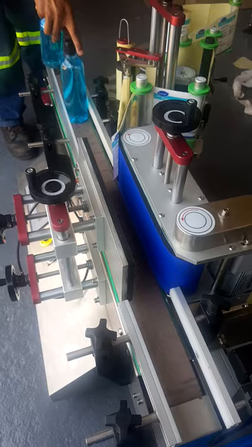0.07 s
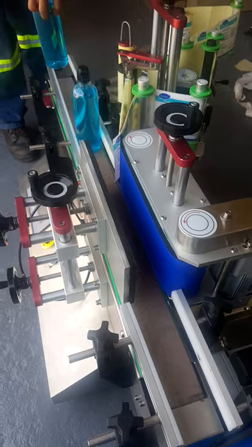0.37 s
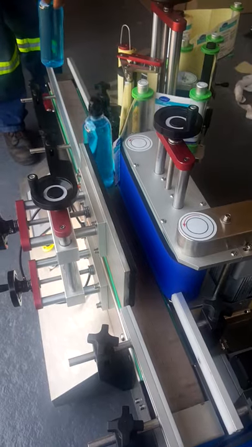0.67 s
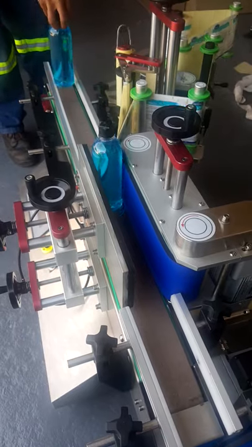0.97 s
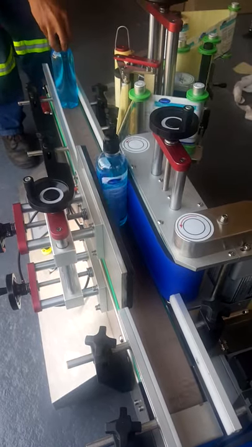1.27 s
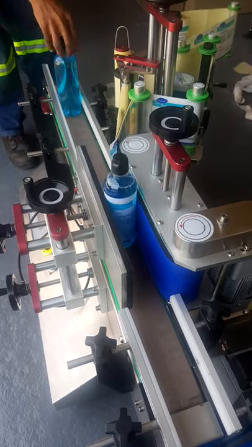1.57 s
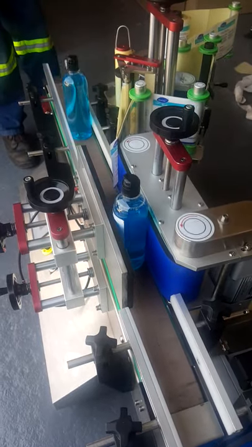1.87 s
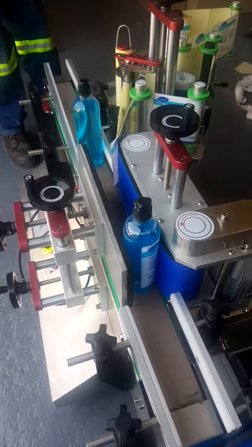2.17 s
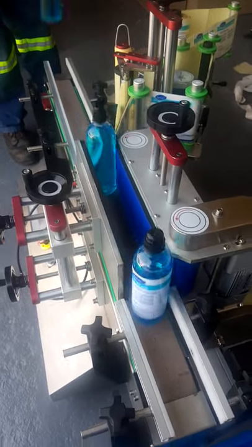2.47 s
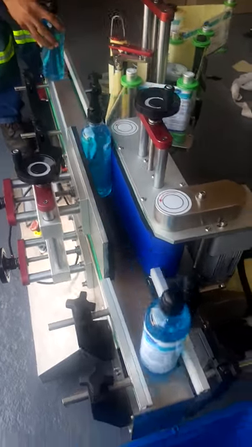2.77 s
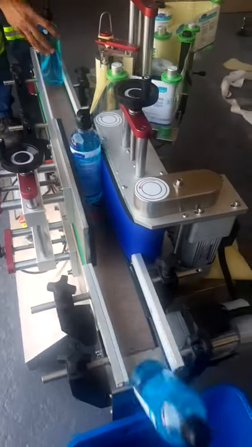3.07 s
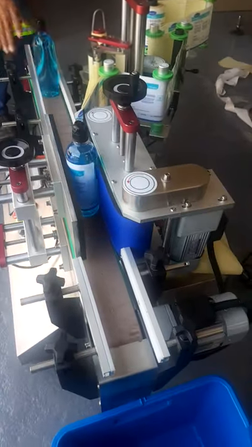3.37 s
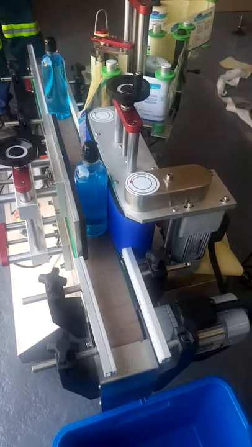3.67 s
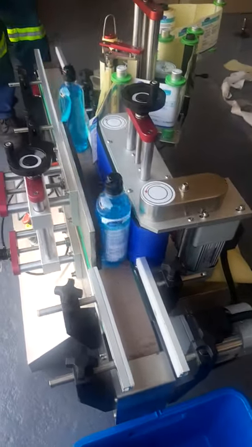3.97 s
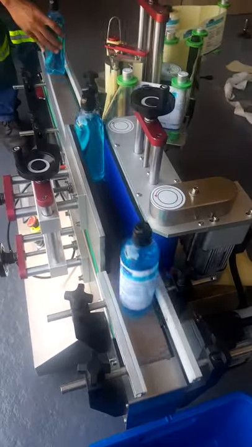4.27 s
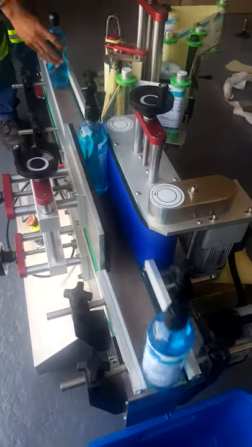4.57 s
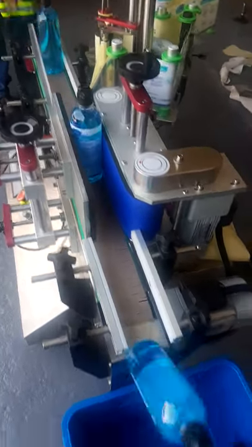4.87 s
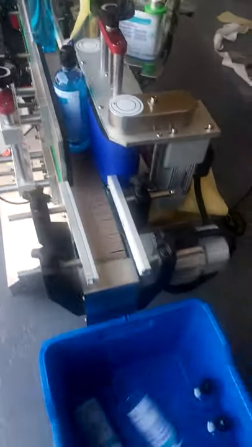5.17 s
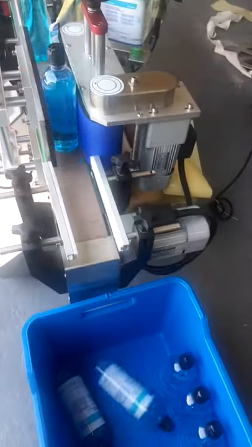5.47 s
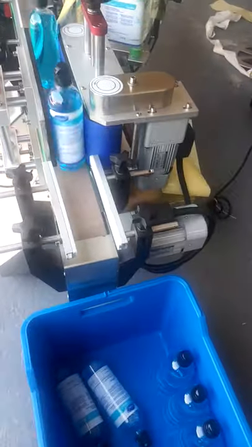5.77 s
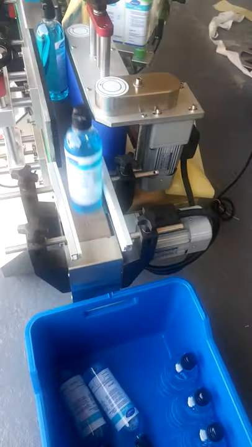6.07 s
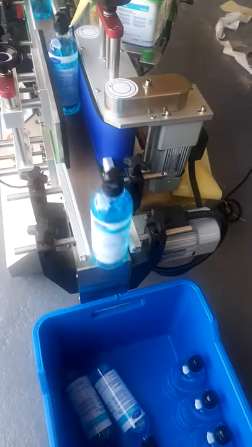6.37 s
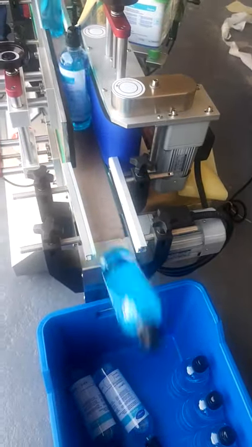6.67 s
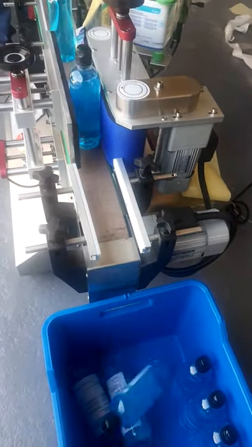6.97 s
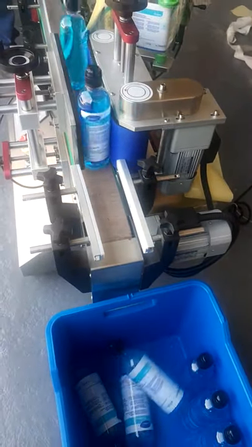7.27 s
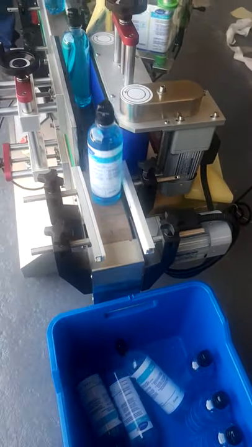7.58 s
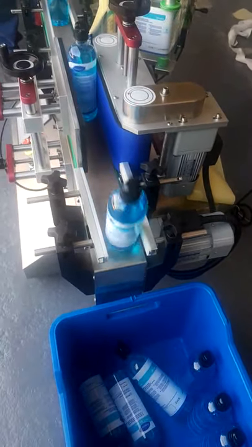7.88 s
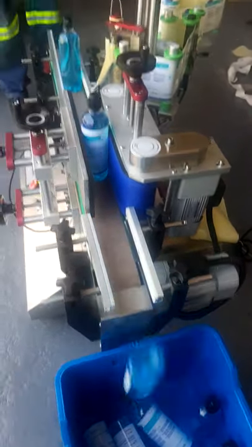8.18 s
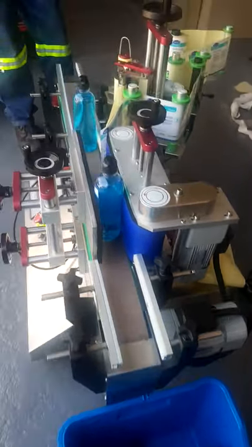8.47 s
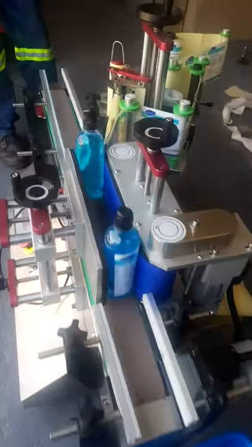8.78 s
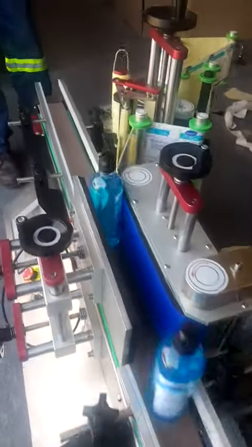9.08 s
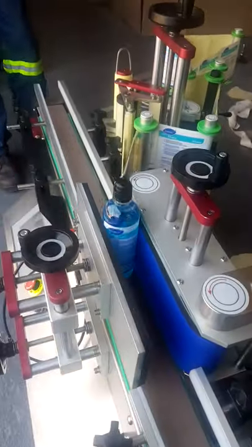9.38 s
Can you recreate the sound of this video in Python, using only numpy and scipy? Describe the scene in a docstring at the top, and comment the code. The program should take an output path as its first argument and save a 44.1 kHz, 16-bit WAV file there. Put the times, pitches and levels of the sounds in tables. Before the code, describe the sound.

Full plastic bottles drop one by one into a plastic tub with hollow thumps, over a quiet conveyor and short puffs of air.

```python
"""A small bottle labelling machine in a workshop, label head to the left, a bin below the microphone. The sound
fades in: the motor hums, the belt rumbles, a slat chain ticks along its guides. From about 1 s on, air hisses
for each label, the label web squeaks, metal parts click, a bottle is set down on the belt, and now and then a
bottle scrapes the rail. From 3.4 s on, four filled plastic bottles tip off the belt, thud into the plastic bin
and tumble over each other. The gain on the machine dips after the first, then recovers."""
import sys
import numpy as np
from scipy import signal
from scipy.fft import rfft, irfft, next_fast_len
from scipy.io import wavfile

SR = 44100
rng = np.random.default_rng(int(sys.argv[2]) if len(sys.argv) > 2 else 0)


def wav_record(signal):
    """Record a signal, one row per channel, as 16-bit PCM in the file named by sys.argv[1]."""
    frames = np.transpose(np.atleast_2d(signal))
    bounded = np.clip(frames, -1, 1)
    # unit amplitude maps onto the largest positive 16-bit level
    quanta = np.round(bounded * 32767).astype(np.int16)
    wavfile.write(sys.argv[1], SR, quanta)


N = 424241
TIME = np.arange(N) / SR


def from_db(db):
    """Decibels to gain."""
    return 10 ** (np.asarray(db) / 20)


def rms_one(x):
    """Scale to rms 1."""
    return x / np.sqrt(np.mean(x ** 2) + 1e-20)


def at_hz(points, hz):
    """Read a table on a log-frequency axis."""
    freqs, values = np.transpose(points)
    return np.interp(np.log(np.maximum(hz, 1)), np.log(freqs), values)


def add(out, s, sound):
    """Mix a short sound in at s seconds."""
    start = max(round(s * SR), 0)
    out[..., start:start + sound.shape[-1]] += sound[..., :N - start]


def filtered(x, kind, hz, order=2):
    """Causal low-, high- or band-pass."""
    return signal.sosfilt(signal.butter(order, hz, kind, fs=SR, output="sos"), x + 1e-18)


def dying(t, t60):
    """Exponential decay, 60 dB down after t60 seconds."""
    return np.exp(-np.log(1000) * t / t60)


def drift(per_s, size=N):
    """A random wander through per_s points a second; rms 1."""
    knots = rng.standard_normal(int(per_s * size / SR) + 2)
    return rms_one(np.interp(TIME[:size] * per_s, np.arange(len(knots)), knots))


def pan(left_db):
    """Channel gains for a source left of the microphone."""
    return from_db(np.array([[.5], [-.5]]) * left_db)


def shaded(x, shade):
    """The microphone's right side is shaded from a source on the left; shade lists f/Hz, loss/dB."""
    gain = from_db(-at_hz(shade, np.fft.rfftfreq(2 * N, 1 / SR)))
    return np.array([x[0], irfft(rfft(x[1], 2 * N) * gain)[:N]])


# likeness of left and right at the microphone: f/Hz, correlation
STEREO_LIKENESS = [(60, 0.71), (130, 1), (260, 0.93), (500, 0.74), (1000, 0.019), (5000, 0.048)]

def noise(spectrum=((100, 0), (1000, 0)), size=N):
    """Coloured stereo noise, alike in the bass and unrelated in the treble; rms 1."""
    length = next_fast_len(size, True)
    hz = np.fft.rfftfreq(length, 1 / SR)
    mid, side = rfft(rng.standard_normal((2, length)))
    alike = at_hz(STEREO_LIKENESS, hz)
    both = np.sqrt(1 + alike) * mid + np.sqrt(1 - alike) * side * [[1], [-1]]
    return rms_one(irfft(both * from_db(at_hz(spectrum, hz)), length)[:, :size])


# decay of the room around the microphone: f/Hz, t60/s
ROOM_DECAY = [(100, 0.61), (300, 1), (600, 0.51), (1500, 0.7), (4000, 0.57), (12000, 0.29)]

def workshop(x, build_s=0.012):
    """Diffuse reverberation that builds up quickly and lasts longest in the bass."""
    t, edges = TIME[:SR], np.geomspace(40, 16000, 10)
    tail = 0
    for low, high in zip(edges, edges[1:]):
        t60 = at_hz(ROOM_DECAY, np.sqrt(low * high))
        tail += filtered(noise(size=len(t)), "band", [low, high]) * dying(t, t60)
    tail *= 1 - np.exp(-t / build_s)
    return signal.fftconvolve(x, tail / np.sqrt(np.sum(tail ** 2) / 2), axes=1)[:, :N]


# recording gain on the machine's sound: t/s, level/dB
GAIN_CURVE = [(0.4, -79.5), (0.6, -66), (2.05, -54), (2.75, -39), (3.35, -34), (4.05, -50.5), (4.5, -46),
              (5.8, -44), (6.2, -40.5), (6.9, -44), (7.8, -36), (9.3, -37.5), (9.6, -38)]
GAIN_OPEN = TIME > GAIN_CURVE[0][0]

def gain_db(s):
    """The gain on the machine's sound fades in, dips after the first fall, then recovers."""
    return np.interp(s, *np.transpose(GAIN_CURVE))


# notes of the motor: f/Hz, level/dB, unused
MOTOR_NOTES = [(101.2, -6.5, 0), (148, -8, 0)]

def motor(waver=0.12):
    """The motor hums on two low notes, each wavering in phase and strength."""
    hum = 0
    for hz, db, _ in MOTOR_NOTES:
        phase = 2 * np.pi * hz * TIME + 2 * waver * drift(9.6)
        hum += from_db(db) * np.sin(phase) * (1 + waver * drift(13))
    return hum


# resonances of the frame and guide rails: f/Hz, lift/dB
FRAME_MODES = [(510, 5), (790, 4.5), (1370, 4.5), (1740, 7)]

def frame(x, q=55, swing_db=3):
    """Frame and rails ring with what shakes them, each resonance coming and going as the chain rubs."""
    ringing = 0
    for hz, db in FRAME_MODES:
        lift = from_db(db + swing_db * drift(9)) - 1
        ringing += lift * signal.lfilter(*signal.iirpeak(hz, q, fs=SR), x)
    return x + ringing


# contacts within one slat's cycle: t/s, level/dB
SLAT_TICKS = [(.005, 0.5), (.055, -6)]
# colour of a slat tick: f/Hz, density/dB
SLAT_COLOUR = [(150, 5.5), (700, 12.5), (1450, 5), (1850, 8), (3200, 3.5), (6000, -14), (15000, -28)]

def slats(per_s=11.604, t60=0.077):
    """Each slat ticks as it meets the sprocket, and again as it settles."""
    ticks, tick = np.zeros(N), dying(TIME[:SR // 8], t60)
    for cycle in np.arange(0, TIME[-1] - 1 / per_s, 1 / per_s):
        for s, db in SLAT_TICKS:
            add(ticks, cycle + s, from_db(db + rng.normal()) * tick)
    return ticks * noise(SLAT_COLOUR)


# rumble and rub of the belt: f/Hz, density/dB
BELT_COLOUR = [(25, -11), (50, -9.5), (105, -3.5), (185, -4), (260, -9), (641, -10.5), (1040, -7),
               (1130, -12.5), (2000, -14), (6210, -29.5), (13200, -37.5), (16000, -50)]

def conveyor(belt_db=-3.5, hum_db=-4.5, tick_follows=0.87, hum_follows=0.88):
    """Belt rumble, motor hum and slat ticks under one gain curve; hum and ticks follow it a bit less."""
    level_db = gain_db(TIME)
    swing_db = level_db - level_db.mean()
    belt = from_db(belt_db) * noise(BELT_COLOUR)
    hum = from_db(hum_db + (hum_follows - 1) * swing_db) * motor()
    ticks = from_db((tick_follows - 1) * swing_db) * slats()
    return from_db(level_db) * GAIN_OPEN * (frame(belt + ticks) + hum) * pan(0.63)


# bright snap shared by chain links, metal parts and caps: f/Hz, density/dB
SNAP_COLOUR = [(800, -6), (3100, 9), (4700, -3), (5600, 2.5), (6700, 0), (11000, 9), (13000, 5.5),
               (15500, -5)]

def chatter(per_s=31, level_db=-16.5, spread_db=4, t60=0.021):
    """Loose chain links tick at random, most of them faintly."""
    onsets = (rng.random(N) < per_s / SR) * GAIN_OPEN
    sizes = from_db(level_db + gain_db(TIME) + spread_db * np.minimum(rng.exponential(1, N), 3))
    return signal.fftconvolve(onsets * sizes, dying(TIME[:SR // 20], t60))[:N] * noise(SNAP_COLOUR)


# bottles rubbing the guide rail, and at 1.49 s one set down on the belt: t/s, length/s, level/dB
BOTTLE_RUBS = [(1.49, 0.1, -57), (2.578, 0.2, -48), (6.577, 0.26, -42), (7.84, 0.054, -30.5)]
# colour of the rub: f/Hz, density/dB
RUB_COLOUR = [(300, -4.5), (900, 2), (2400, -4), (5000, -14.5), (15000, -26)]

def scrape(rise_s=0.02):
    """A bottle catches the guide rail and rubs roughly along it, easing off; early on, one is set down on the
    belt with a short rub."""
    rub = sum(from_db(db) * np.sqrt(np.interp(TIME - s, [0, rise_s, length], [0, 1, 0]))
              for s, length, db in BOTTLE_RUBS)
    catches = rms_one(from_db(3.5 * drift(110)))
    return rub * catches * noise(RUB_COLOUR)


# stray clicks at the label head: t/s, level/dB
STRAY_CLICKS = [(0.8516, -65), (2.1558, -49), (3.1443, -44.5), (4.1907, -50.5), (7.5289, -37),
                (8.5822, -39.5), (8.7645, -42.5), (8.9236, -38.5), (9.4902, -42)]
# modes of the clicking metal: f/Hz, level/dB
METAL_MODES = [(3400, -2), (5700, -3), (8958, -3), (10650, -1), (11015, 0), (11750, 0)]

def clicks(first_turn_s=2.302, turn_s=1.4675, turn_db=-13.5, follows=0.59, ring_db=-7, ring_t60=0.09):
    """A snap sets thin metal ringing, never twice alike, once per roller turn and at stray moments."""
    out, t = np.zeros((2, N)), TIME[:SR // 4]
    turns = [(s, turn_db + follows * gain_db(s)) for s in np.arange(first_turn_s, TIME[-1], turn_s)]
    attack = 1 - dying(t, 0.00072)
    snap_and_tail = from_db(8) * dying(t, 0.062) + from_db(-19) * dying(t, 0.57)
    for s, db in turns + list(STRAY_CLICKS):
        snap = noise(SNAP_COLOUR, len(t)) * snap_and_tail
        ring = sum(from_db(rng.normal(mode_db, 4)) * np.sin(2 * np.pi * hz * rng.normal(1, 0.012) * t)
                   for hz, mode_db in METAL_MODES)
        add(out, s, from_db(db) * attack * (snap + from_db(ring_db) * ring * dying(t, ring_t60)))
    return out


# slips of the label web, left of the microphone: t/s, length/s, start f/Hz, end f/Hz
WEB_SLIPS = [(1.0, 0.51, 1934, 1890), (2.937, 0.2, 2033, 1866), (4.34, 0.16, 1967, 1700),
             (4.674, 0.21, 1714, 2080), (5.889, 0.091, 1856, 1760), (5.928, 0.066, 2080, 2140),
             (6.077, 0.12, 1970, 2180), (6.288, 0.095, 2154, 1890), (7.452, 0.061, 2100, 2070),
             (7.575, 0.15, 2300, 1980), (9.258, 0.19, 1917, 2000)]

def squeaks(level_db=-9, octave_db=-9, fade_db_per_s=13, follows=0.8):
    """The web sticks and slips in spurts: a raspy glide with a weak octave; a long slip is fainter."""
    out = np.zeros((2, N))
    unsteady = 1 + .02 * drift(80) + .058 * drift(700)
    spurts = rms_one(from_db(4 * drift(250) + 2.4 * drift(35)))
    level = from_db(level_db + follows * gain_db(TIME)) * spurts
    for s, length, start_hz, end_hz in WEB_SLIPS:
        part = (TIME >= s) & (TIME < s + length)
        progress = (TIME[part] - s) / length
        hz = (start_hz + (end_hz - start_hz) * progress) * unsteady[part]
        phase = 2 * np.pi * np.cumsum(hz) / SR + np.array([[0], [np.pi / 2]])   # left, right
        swell = np.sqrt(np.sin(np.pi * progress)) * level[part] * from_db(-fade_db_per_s * length)
        out[:, part] += swell * (np.sin(phase) + from_db(octave_db) * np.sin(2 * phase))
    return out


# one blast at the label head for each label: t/s, relative level/dB
AIR_BLASTS = [(0.86, -8.5), (2.567, -10.5), (4.321, -10.5), (5.867, -9.5), (7.396, -12), (8.885, -11)]
# colour of the hiss: f/Hz, density/dB
AIR_COLOUR = [(120, -4), (400, 13.5), (2000, 8), (3000, 6), (7400, 2.5), (10000, 7.5), (12500, 5),
              (15500, 1.5)]

def air(level_db=7.5, open_s=0.0014, blast_s=0.485, close_t60=0.27, swell_db=1, flutter_db=1.74):
    """A valve opens sharply; the hiss grows a little and dies more slowly when it shuts."""
    flow = np.zeros(N)
    for s, db in AIR_BLASTS:
        age = TIME - s
        valve = np.clip(age / open_s + 1, 0, 1) * dying(np.maximum(age - blast_s, 0), close_t60)
        flow += valve * from_db(db + swell_db * np.clip(age / blast_s - .5, -.5, .5))
    return flow * from_db(level_db + gain_db(TIME) + flutter_db * drift(67)) * noise(AIR_COLOUR)


# bottles rebounding on the bin floor: t/s, thud/dB, rocking time/s
BOUNCES = [(3.617, -19, 0.058), (3.756, -27, 0.056), (3.841, -28, 0.16), (5.405, -24.5, 0.038),
           (5.559, -27.5, 0.084), (5.644, -32, 0.066), (5.715, -35, 0.031), (7.176, -22.5, 0.036)]

def rocking(boom_hz=120, boom_db=-5.5, waver=0.05):
    """After each rebound the rocking bottle keeps the bin floor booming for a moment."""
    push = sum(from_db(db + boom_db) * np.interp((TIME - s) / length, [0, .1, .6, 1], [0, 1, .7, 0])
               for s, db, length in BOUNCES)
    phase = 2 * np.pi * np.cumsum(boom_hz * (1 + waver * drift(40))) / SR
    return push * np.sin(phase) * from_db(2 * drift(24.27))


# a pump cap hits the bin or another bottle: t/s, crack/dB
CAP_STRIKES = [(3.425, -9), (5.177, -10), (6.923, -16.5), (7.098, -31), (7.267, -28), (8.386, -11.5)]

def caps(snap_db=-10, t60=0.0091):
    """The hard caps add a short, bright snap to their blows."""
    out, t = np.zeros((2, N)), TIME[:SR // 20]
    for s, db in CAP_STRIKES:
        add(out, s, from_db(db + snap_db) * noise(SNAP_COLOUR, len(t)) * dying(t, t60))
    return out


# modes of the loaded bin: f/Hz, level/dB, t60/s
BIN_MODES = [(115, -10.5, 0.29), (149, -16, 0.26), (259.7, -14.5, 0.33), (328, -11.5, 0.26),
             (410.1, -11.5, 0.19), (552.7, -12.5, 0.24), (620, -19.5, 0.32), (799, -15, 0.058),
             (980, -11, 0.086)]

def bin_ring(thud, hollow, knock, ring_db=-4, build_t60=0.033, spread_db=3.5):
    """The bin floor swings alike after every blow; the higher wall modes share each blow differently."""
    out, t = 0, TIME[:SR * 3 // 4]
    for hz, db, t60 in BIN_MODES:
        drive_db = at_hz([(150, thud), (260, hollow), (430, knock)], hz)
        chance = min(hz / 900, 1)
        phase = chance * (rng.normal(0, 1, (2, 1)) + np.pi * rng.normal())
        gain = from_db(drive_db + db + ring_db + spread_db * chance * rng.normal())
        out += gain * np.sin(2 * np.pi * hz * t + phase) * (dying(t, t60) - dying(t, build_t60))
    return out


# falls into the bin, a list of blows per bottle, landing first: t/s, thud/dB, hollow note/dB, knock/dB
FALLS = [
    [(3.388, 0.5, -6, -2), (3.397, -31, -11, -5.5), (3.423, -15, -1, -9.5), (3.432, -28, -10.5, -4)],
    [(5.150, -25, -23, -18), (5.167, -11, -5, -41), (5.175, -12, -1.5, -7.5), (5.185, -28, -28, -7),
     (5.233, -24, -17, -35), (5.342, -15, -19, -19), (5.439, -6.5, -17, -9)],
    [(6.923, -9.5, -16.5, -25), (6.944, -15, -12, -19), (6.971, -9, -11, -11), (7.268, -15, -8, -23.5),
     (7.39, -12.5, -15, -15.5), (7.41, -15, -5.5, -22), (7.46, -12, -17, -25.5)],
    [(8.254, -2.5, 2.5, -12), (8.298, -6.5, 2, -16), (8.33, -4, -1.5, -8), (8.37, 0, -1, -3.5),
     (8.869, -12.5, -15, -16.5)],
]

def blows(crack_db=-10, softening_db_per_s=19):
    """Falls, caps and rebounds as t/s, thud/dB, hollow note/dB, knock/dB, crack/dB."""
    for fall in FALLS:
        landing_s = fall[0][0]
        for s, thud, hollow, knock in fall:
            softening_db = softening_db_per_s * (s - landing_s)   # a slowing bottle cracks less
            yield s, thud, hollow, knock, max(thud, knock) + crack_db - softening_db
    for s, crack in CAP_STRIKES:
        body = crack - 9
        yield s, body, body, body, crack
    for s, thud, _ in BOUNCES:
        yield s, thud, thud - 4.5, thud - 4.5, thud - 11.5


# hollow note of each fall, set by how the bottle lands: f/Hz
FALL_NOTES = [226, 236, 272, 243]

def hollow_note(s, t, t60=0.081):
    """The last bottle's liquid-loaded wall swings a few cycles; the pitch varies with where it is hit."""
    landed = sum(fall[0][0] <= s + .02 for fall in FALLS)
    hz = FALL_NOTES[max(landed - 1, 0)] * rng.normal(1, 0.014)
    return np.sin(2 * np.pi * hz * t) * (dying(t, t60) - dying(t, 0.0028))


def contact(band_hz, top_hz, size):
    """The pulse of a yielding contact, its top rounded off; peak 1."""
    pulse = filtered(filtered(signal.unit_impulse(size), "band", band_hz), "low", top_hz)
    return pulse / np.abs(pulse).max()


def rattle(knock, t, level_db=-2.5, growth=0.27, t60=0.094):
    """The bin's load answers a blow with a scatter of jolts; hard blows shake it more."""
    jolts = from_db(5 * drift(150, len(t)))
    scatter = noise(size=len(t)) * jolts * (dying(t, t60) - dying(t, 0.015))
    return scatter * from_db(level_db + growth * (knock + 18)) / np.sqrt(np.sum(scatter ** 2) / 2)


# colour of hard plastic cracking: f/Hz, density/dB
CRACK_COLOUR = [(500, 8.5), (1400, 8.5), (2300, -2), (6000, -15.5), (11000, -15), (16000, -23)]

def bottles(thud_db=-6.5, hollow_db=-6.5, knock_db=-1.5, wall_hz=606, lag_s=0.0023, crack_lead_s=0.002):
    """Each blow is a crack, a push on the bin floor, a hollow note and a knock of the bottle wall."""
    out, t = np.zeros((2, N)), TIME[:SR // 6]
    push = contact([82, 236], top_hz=900, size=len(t))
    tap = contact([335, 758], top_hz=1400, size=len(t))
    for s, thud, hollow, knock, crack in blows():
        body = from_db(thud + thud_db) * push + from_db(hollow + hollow_db) * hollow_note(s, t)
        wall_ring = np.sin(2 * np.pi * wall_hz * rng.normal(1, 0.043) * t) * dying(t, 0.05)
        wall = from_db(knock + knock_db) * (tap + from_db(-5) * wall_ring)
        skin = from_db(crack) * noise(CRACK_COLOUR, len(t)) * dying(t, 0.032)
        load = signal.fftconvolve(rattle(knock, t), wall + 0.74 * skin, axes=1)
        add(out, s + lag_s - crack_lead_s, skin)   # the skin cracks before the liquid's weight arrives
        for sound in (body, wall, load, bin_ring(thud, hollow, knock)):
            add(out, s + lag_s, sound)
    return filtered(out + rocking() + caps(), "high", 55, order=4)


def scene(room_db=-13):
    """From the microphone: the label head lies to the left, the bin below, the workshop all round."""
    falls = bottles()
    falls += from_db(room_db) * workshop(falls)
    head = shaded(air() + clicks() + chatter(), [(1500, 2.9), (4400, 9.2), (8000, 18), (15000, 20.5)])
    web = squeaks() * pan(8)
    bin_and_belt = falls + conveyor() + scrape()
    return head + web + shaded(bin_and_belt, [(300, 0), (2300, 2.5), (5000, 10.5), (12000, 16.5)])


def record(dry, ceiling=1.1, cutoff_hz=15900):
    """The microphone drops the deepest bass, peaks are rounded, the top is cut."""
    lean = filtered(dry, "high", 38, order=3)
    rounded = ceiling * np.tanh(lean / ceiling)
    return signal.sosfilt(signal.ellip(12, .1, 80, cutoff_hz, fs=SR, output="sos"), rounded)


dry = scene()
out = record(dry)
wav_record(out)
```